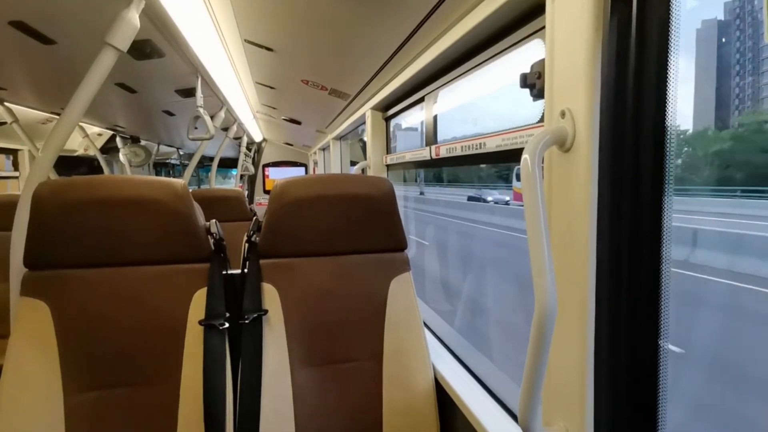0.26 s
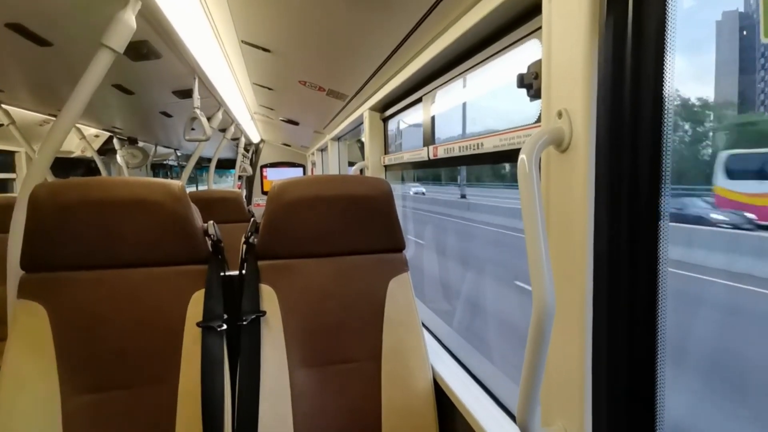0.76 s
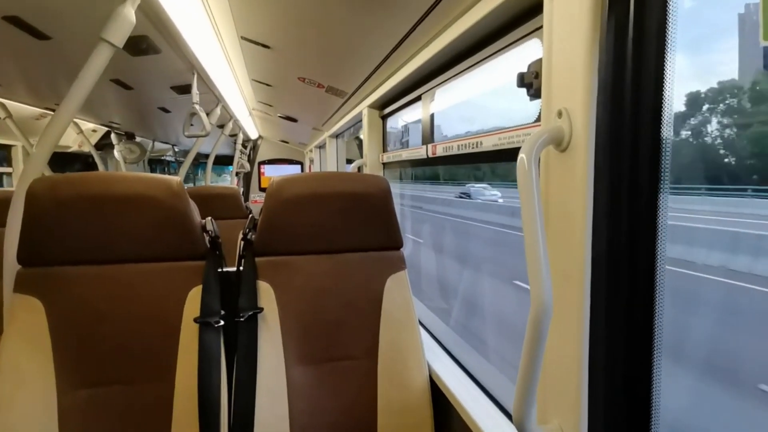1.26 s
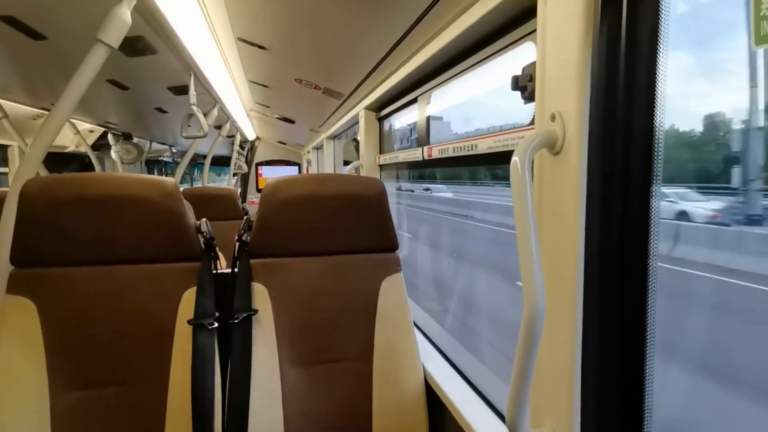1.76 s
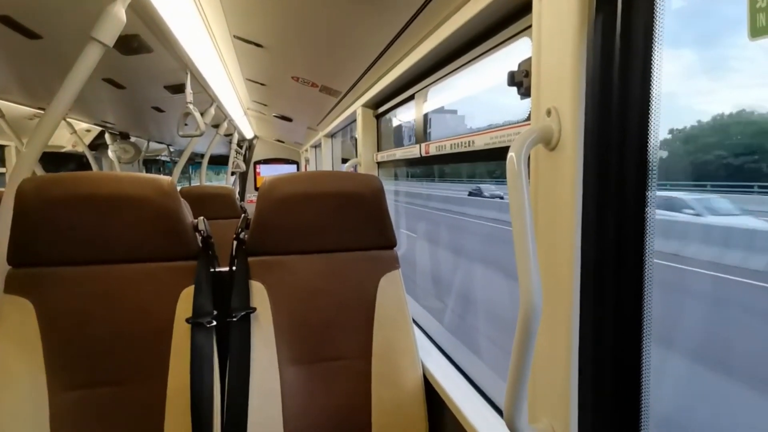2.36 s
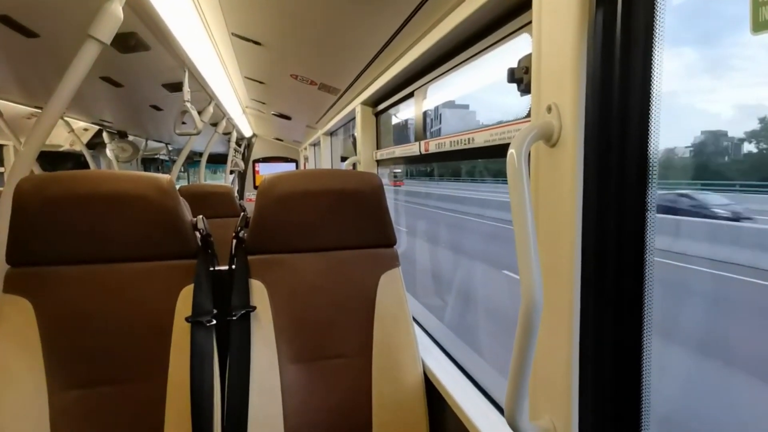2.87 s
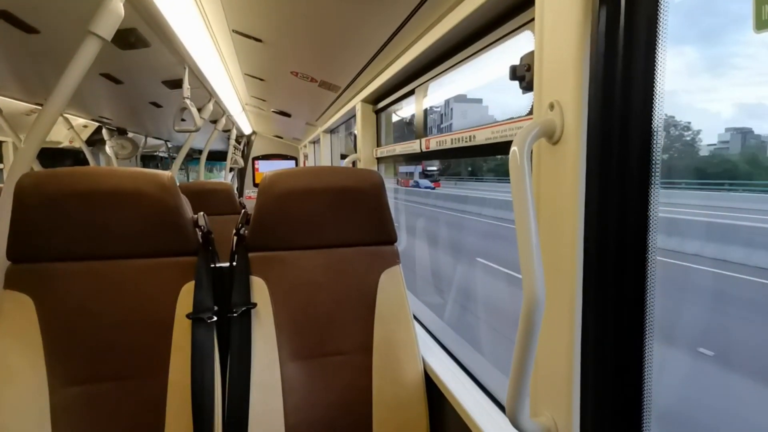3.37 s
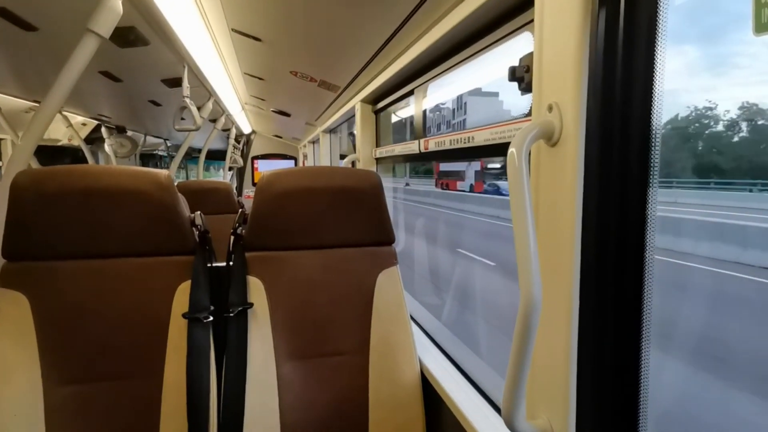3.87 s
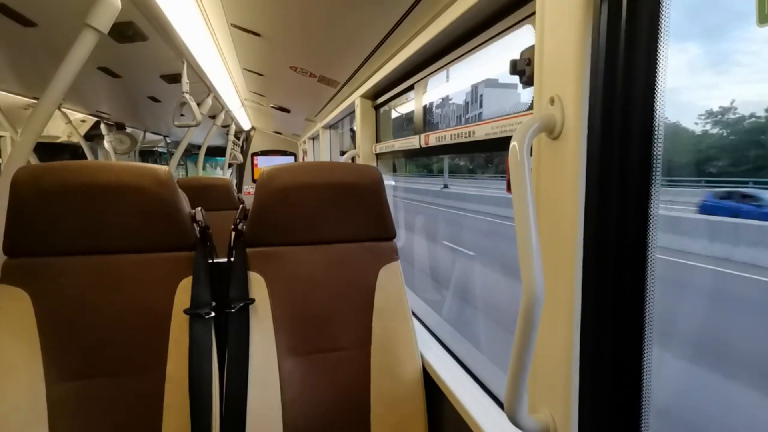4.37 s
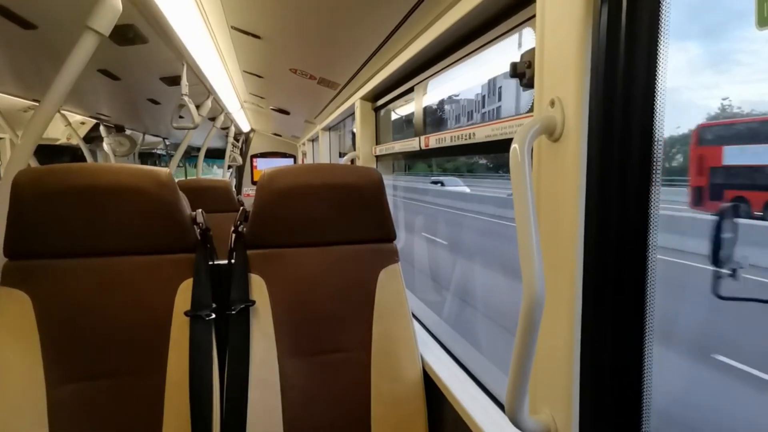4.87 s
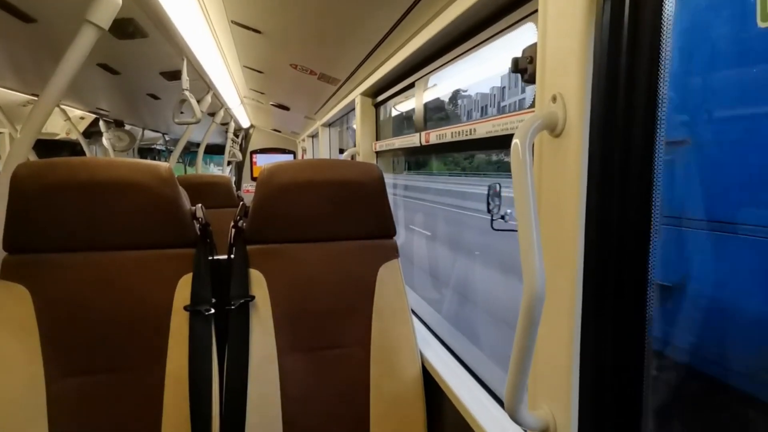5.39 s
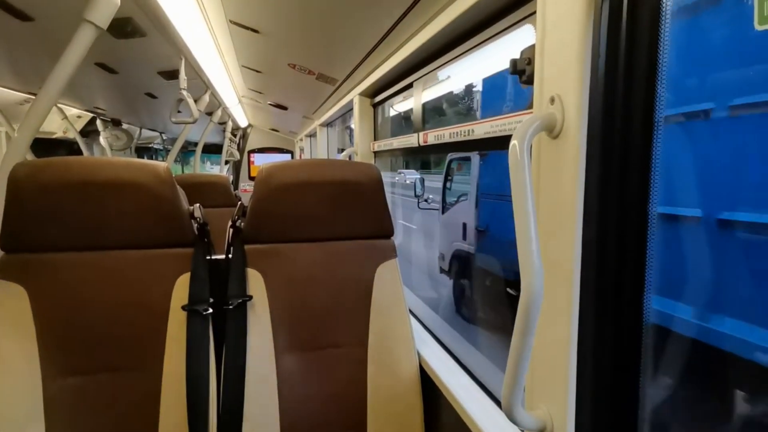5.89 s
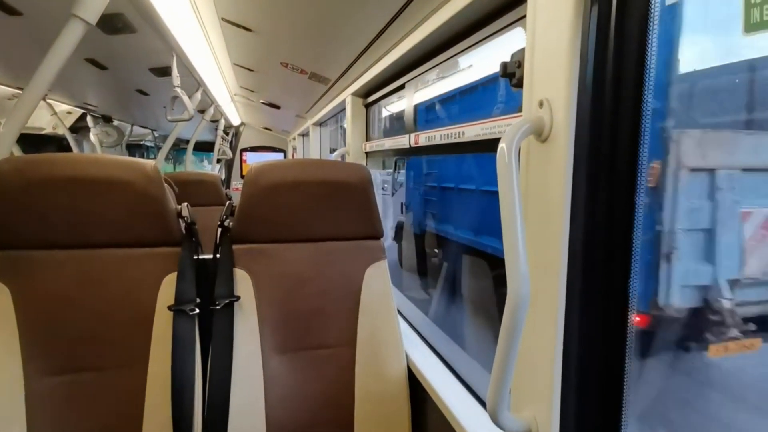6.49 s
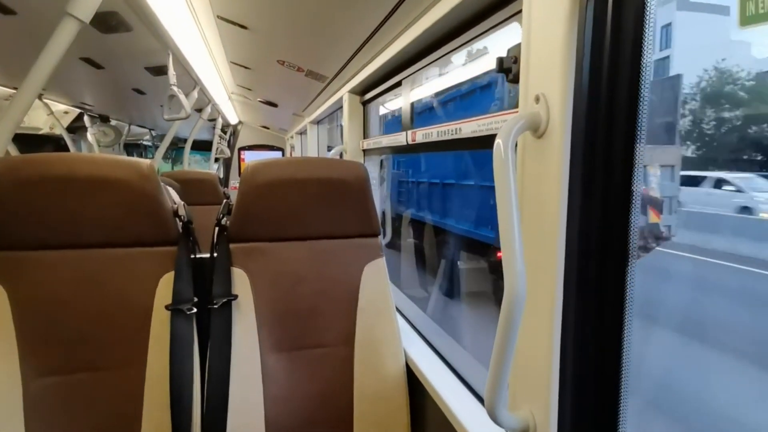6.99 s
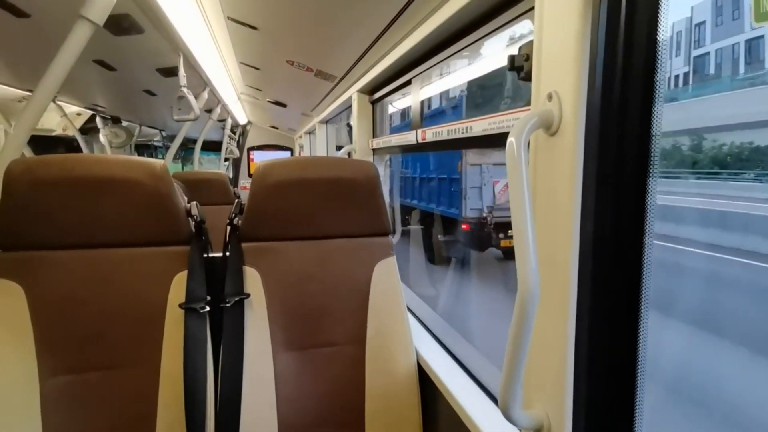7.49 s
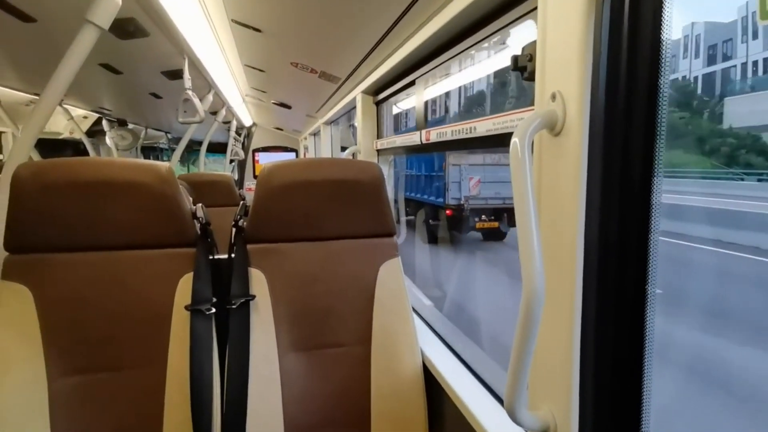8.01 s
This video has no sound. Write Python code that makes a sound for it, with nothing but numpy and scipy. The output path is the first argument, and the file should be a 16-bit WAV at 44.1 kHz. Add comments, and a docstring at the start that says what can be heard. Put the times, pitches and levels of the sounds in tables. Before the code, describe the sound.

Close stereo sound from the rear seats inside a moving double-decker bus. From 0 s a six-cylinder diesel drones deeply, with a strong boom around 130 Hz, a lower throb near 65 Hz and soft road rumble. Its pitch climbs slowly and smoothly throughout, by about two semitones. At 1.7 to 1.9 s the boom falls away sharply, leaving a thinner, quieter hum, then it steadily rebuilds. From 2.5 s coarse engine roar, airy hiss, humming panels and fine loose-trim rattle grow. Small puffs and low buzzes appear around 2.5, 3.3 and 3.9 s. The lower firing throb weakens around 4.5 to 5.8 s and returns by 6.8 s. Faint gear whine comes and goes, and a very high turbo whistle wavers and creeps upward. At 6.4 to 6.9 s a cluster of hissing puffs and buzzes passes. The end, at about 8.2 s, is full, booming and rattly, still under load.

```python
"""A six-cylinder diesel slowly gains speed, heard by two microphones in the rear seats of a double-decker.
Its four-stroke cycle is a comb of low sine orders that boom in the saloon; order 12 drops, then builds.
Gear teeth and the turbocharger whine faintly as sines that waver differently at each microphone.
Road rumble, block roar and hiss are coloured noise; panels hum as narrow bands of noise.
Taps set loose trim ringing, and now and then short bands of noise puff and buzz."""
import sys
import numpy as np
from scipy import signal
from scipy.fft import rfft, irfft, next_fast_len
from scipy.io import wavfile

SR = 44100
rng = np.random.default_rng(int(sys.argv[2]) if len(sys.argv) > 2 else 0)


def waveform_to_disk(signal):
    """Save audio, clipped to [-1, 1], as 16-bit WAV at the path in sys.argv[1]."""
    frames = np.transpose(np.atleast_2d(signal))
    scaled = np.clip(frames, -1, 1) * 32767
    samples = np.round(scaled).astype(np.int16)
    wavfile.write(sys.argv[1], SR, samples)


N = 363825


def from_db(db):
    """Decibels to amplitude gain."""
    return np.exp(np.asarray(db) * (np.log(10) / 20))


def in_time(rows):
    """Table columns joined by straight lines, one value a sample."""
    s, *columns = np.transpose(rows)
    return [np.interp(np.arange(N) / SR, s, column) for column in columns]


def at_hz(points, hz):
    """Spectrum table read on a log-frequency axis."""
    table_hz, values = np.array(points).T
    return np.interp(np.log(hz), np.log(table_hz), values)


def drift(rate_hz):
    """Slow chance of spread 1: noise at every 40th sample through a double one-pole low-pass."""
    r = np.exp(-2 * np.pi * rate_hz * 40 / SR)
    slow = signal.lfilter([1], [1, -2 * r, r * r], rng.standard_normal(N // 40 + 2002))
    slow = slow[2000:]   # the filter has settled
    return np.interp(np.arange(N) / 40, np.arange(len(slow)), slow / slow.std())


# Balance of the two microphones. Each row: frequency in Hz, left minus right in dB.
BALANCE_DB = [(30, 11), (65, 3.5), (100, 7), (128, 4.5), (148, -1), (175, -7), (270, -2.5), (350, 2.5),
              (700, -0.5), (1290, -1), (2400, 1), (4400, -3), (8100, 2.5), (15000, -0.5)]
# Phase lag of the left microphone behind the right. Each row: frequency in Hz, lag in radians.
LEFT_LAG = [(30, 0.98), (130, 0.49), (300, 1), (500, 0.017), (15000, 0.08)]
HALF_EACH = np.array([[.5], [-.5]])   # left and right share a difference equally


def tone(turns, first_hz, last_hz):
    """A sine of rms 1 as the two microphones get it; balance and lag slide with its pitch."""
    balance_db, lag = (np.linspace(at_hz(table, first_hz), at_hz(table, last_hz), len(turns))
                       for table in (BALANCE_DB, LEFT_LAG))
    return np.sqrt(2) * from_db(HALF_EACH * balance_db) * np.cos(2 * np.pi * turns - HALF_EACH * lag)


BOOM_DB, BOOM_BUILDS_DB_PER_S = -14, 2
DROP_AT_S, DROP_TAKES_S, DROP_DB = 1.708, 0.2, 15


def boom_level():
    """The boom, order 12, in dB: it holds, drops away and slowly builds again."""
    since_drop_s = np.arange(N) / SR - DROP_AT_S
    drop_db = DROP_DB * np.clip(since_drop_s / DROP_TAKES_S, 0, 1)
    return BOOM_DB - drop_db + BOOM_BUILDS_DB_PER_S * np.maximum(since_drop_s - DROP_TAKES_S, 0)


# Orders 6, 7 and 9 sink and come back, while order 8 swells and fades.
# Each row: time in seconds, then the levels in dB of the firing order 6 and of orders 7, 8 and 9.
FIRING = [(0.0, -14.5, -23, -37, -22.5), (.75, -16, -21, -40, -21.5), (1.5, -18.5, -22, -45, -22),
          (2.85, -19, -21, -39, -23), (3.5, -24, -22, -35, -27.5), (4.6, -31, -24, -28, -34),
          (5.75, -33, -27.5, -27.5, -43), (6.25, -25, -30, -29, -32), (6.75, -18, -27, -32, -28),
          (7.3, -17.5, -25, -33, -25), (8.25, -17.5, -20, -40, -20)]
# The other orders of the four-stroke cycle. Each row: order, level in dB, share of the firing swell,
# share of the boom swell, dB gained per cycle per second of engine speed.
ORDERS_WEAK = [(5, -38, .27, .1, 9.7), (10, -33, .75, .12, 5.2), (11, -30, 0, .55, 1.1),
               (13, -36.5, -.1, .8, -10), (14, -37.5, -.3, .5, 11), (15, -40.5, .38, .6, 4),
               (16, -36, -.1, .37, 7.5), (17, -48, .1, .6, 0), (18, -35.5, .25, .35, 0),
               (19, -48, -.3, .8, -6), (20, -44.5, -.3, .3, 20), (21, -53, 0, .5, 0), (22, -53, 0, .5, 0),
               (23, -51, 0, .5, 0), (25, -53, 0, .5, 0), (27, -52, 0, .5, 0), (31, -50, 0, .5, 3),
               (34, -52, 0, .5, 3), (24, -48, .5, .85, -2), (29, -52, -.3, .8, 11.7), (30, -45, .2, .6, 3),
               (36, -46.5, -.3, .4, 3), (39, -47, -.3, 0, 8), (66, -58, .2, -.1, 10.8)]
# One cylinder fires hardest: where in the cycle, in turns, orders 6 and 7 swing together.
# The other orders arrive spread over the cycle, and all stray by chance.
STRONG_STROKE_AT, SPREAD_TURNS, STRAY_TURNS = .17, .1, .05
UPPER_WAVER_DB = 1.5   # for orders above the boom
SLOW_TURNS = .02       # slow slide of phase, per 6 orders


def engine_orders(per_s, boom_db, waver_db, waver_turns):
    """Each order is a sine locked to the engine cycle, wavering in level and phase."""
    firing_db, seventh_db, eighth_db, ninth_db = in_time(FIRING)
    cycles = np.cumsum(per_s) / SR
    swells = [curve - curve.mean() for curve in (firing_db, boom_db, per_s)]
    levels_db = {6: firing_db, 7: seventh_db, 8: eighth_db, 9: ninth_db, 12: boom_db}
    for order, db, *shares in ORDERS_WEAK:
        levels_db[order] = db + sum(share * swell for share, swell in zip(shares, swells))
    low = 0
    for order, db in levels_db.items():
        order_waver_db = UPPER_WAVER_DB if order > 12 else waver_db
        gain = from_db(db + order_waver_db * drift(3.0))
        arrival = SPREAD_TURNS * (order - 6.5) ** 2 + STRAY_TURNS * rng.standard_normal()
        slide = order / 6 * (waver_turns * drift(3.7) + SLOW_TURNS * drift(.3))
        turns = order * (cycles - STRONG_STROKE_AT) + arrival + slide
        # all orders are low, so every 8th sample is enough
        low = low + gain[::8] * tone(turns[::8], order * per_s[0], order * per_s[-1])
    return signal.resample_poly(low, 8, 1, axis=1)[:, :N]


MESH_PER_CYCLE, MESH_HARMONICS = 50.1, (8, 9, 10, 11, 12)   # gear teeth met per engine cycle
MESH_DB = -69.5   # each gear harmonic between swells
# A gear harmonic swells out of the hiss.
# Each row: centre in seconds, half length in seconds, harmonic number, peak in dB.
MESH_SWELLS = [(1.0, .9, 8, -62), (.72, .12, 8, -63), (2.1, .22, 8, -57), (2.44, .16, 8, -53),
               (2.8, 0.13, 8, -57), (3.15, .1, 8, -64), (3.7, .1, 8, -59), (5.31, .24, 8, -55),
               (7.1, 0.33, 8, -56), (7.85, 0.13, 8, -59), (1.33, .45, 9, -60.5), (6.05, 0.33, 9, -55),
               (4.5, .3, 10, -63), (5.75, .5, 10, -60), (4.5, .5, 11, -56), (5.4, .4, 11, -49),
               (6.0, .2, 11, -55), (6.9, 0.2, 11, -54), (7.6, .45, 11, -57), (.6, 0.1, 12, -60),
               (1.5, 0.49, 12, -59), (2.9, 0.3, 12, -58), (4.5, 0.28, 12, -63)]
FAINT_ORDER = 432.5   # a fainter whine between gear harmonics 8 and 9, in turns per engine cycle
# Swells of that fainter whine. Each row: centre in seconds, half length in seconds, peak in dB.
FAINT_SWELLS = [(1.02, .16, -63), (1.45, .15, -67), (2.5, .35, -61)]
# Pitch of the turbocharger whistle. Each row: time in seconds, frequency in Hz.
TURBO_HZ = [(0.0, 11950), (.2, 11895), (0.55, 11910), (.85, 12040), (1.4, 12000), (1.9, 12120),
            (2.6, 12135), (3.15, 12280), (3.8, 12250), (4.3, 12275), (5.0, 12360), (5.9, 12380),
            (6.4, 12420), (7.2, 12440), (8.25, 12505)]
# The whistle throbs about once a second and the throb flattens with time.
TURBO_DB, THROB_DB = -62.5, 8
THROB_FIRST_S, THROB_PERIOD_S, THROB_FADE_S = 0.35, 0.98, 8


def whines(per_s, flicker_db, jitter_turns):
    """Gear-mesh harmonics and turbocharger: sines that break up separately at each microphone."""
    t = np.arange(N) / SR
    lines = []   # pitch in Hz and gain of each whine
    for k in MESH_HARMONICS:
        swells = sum(from_db(db) * np.exp(-((t - s) / half) ** 8)
                     for s, half, harmonic, db in MESH_SWELLS if harmonic == k)
        lines.append((k * MESH_PER_CYCLE * per_s, from_db(MESH_DB) + swells))
    faint = sum(from_db(db) * np.exp(-((t - s) / half) ** 4) for s, half, db in FAINT_SWELLS)
    lines.append((FAINT_ORDER * per_s, faint))
    throb = np.exp(-t / THROB_FADE_S) * np.cos(2 * np.pi * (t - THROB_FIRST_S) / THROB_PERIOD_S)
    lines.append((in_time(TURBO_HZ)[0], from_db(TURBO_DB + THROB_DB * throb)))
    out = np.zeros((2, N))
    for hz, gain in lines:
        shared_turns = np.cumsum(hz) / SR + rng.random() + jitter_turns * drift(11.0)
        for microphone, offset_turns in zip(out, (0, 1 / 4)):
            turns = shared_turns + offset_turns + jitter_turns / 2 * drift(4.5)
            flicker = from_db(flicker_db * drift(16.0))
            microphone += np.sqrt(2) * gain * flicker * np.cos(2 * np.pi * turns)
    return out


# How alike the noise is at the two microphones.
# Each row: frequency in Hz, likeness from -1 (opposite) to 1 (the same).
LIKENESS = [(30, 0.95), (130, 0.87), (290, 0.99), (640, 0.46), (1400, -0.32), (3000, 0.068),
            (15000, -0.056)]


def stereo_white():
    """Frequencies and the two channels' spectra of noise with the saloon's likeness, balance and lag."""
    size = next_fast_len(N)
    hz = np.maximum(np.arange(size // 2 + 1) * SR / size, 1)
    mid, side = rfft(rng.standard_normal((2, size)))
    alike = np.clip(at_hz(LIKENESS, hz), -1, 1)
    pair = np.sqrt(1 + alike) * mid + np.sqrt(1 - alike) * side * 2 * HALF_EACH
    balance = from_db(HALF_EACH * at_hz(BALANCE_DB, hz))
    return hz, pair * balance * np.exp(-1j * HALF_EACH * at_hz(LEFT_LAG, hz))


def mid_rms_one(x):
    """Scaled so that the mean of both channels has rms 1."""
    return x / np.sqrt(np.mean(x.mean(axis=0) ** 2))


# Panels colour the noise. Each row: frequency in Hz, width in Hz, lift (or dip, if negative) in dB.
PANELS = [(246, 6.3, 3.5), (840, 200, -2), (1651, 13, 8)]


def saloon_noise(spectrum, patchy_db):
    """Noise coloured by source and panels, in octave bands that each flicker a little."""
    hz, pair = stereo_white()
    panels_db = sum(db / (1 + (2 * (hz - f) / width) ** 2) for f, width, db in PANELS)
    pair = pair * from_db(at_hz(spectrum, hz) + panels_db)
    octave = np.log2(hz)
    lowest, highest = np.log2(spectrum[0][0]), np.log2(spectrum[-1][0])
    out = 0
    for centre in np.arange(np.floor(lowest), highest + 1):
        # neighbouring bands add up to one
        band = np.cos(np.pi / 2 * np.clip(octave - centre, -1, 1)) ** 2
        sound = irfft(pair * band, next_fast_len(N))[:, :N]
        out = out + from_db(patchy_db * drift(12.6)) * sound
    return mid_rms_one(out)


# Spectrum of the road under the floor. Each row: frequency in Hz, relative level in dB per Hz.
RUMBLE = [(15, -22), (25, -11), (38, -4), (50, -5.5), (70, -4), (110, -4), (150, -4), (200, -16.5),
          (300, -18.5), (500, -30)]
RUMBLE_DB, RUMBLE_LUMPS_DB = -25.3, 1.5   # mean level, spread of its slow wander
RUMBLE_FOLLOWS = 0.33   # share of the boom swell


def road_rumble(boom_swell_db):
    """Low road noise that wanders slowly and partly follows the boom."""
    level_db = RUMBLE_DB + RUMBLE_FOLLOWS * boom_swell_db + RUMBLE_LUMPS_DB * drift(0.53)
    return from_db(level_db) * saloon_noise(RUMBLE, patchy_db=0.5)


# Spectrum of the hiss in the saloon. Each row: frequency in Hz, relative level in dB per Hz.
HISS = [(880, -7), (1500, -0.5), (2130, -5.5), (2440, 0.5), (2880, -4.5), (3540, -4.5), (4100, -6),
        (4560, -8), (5030, -9.5), (6680, -4), (7730, -13), (9310, -7), (12400, -10.5), (15500, -22)]
HISS_DB, HISS_GAINS_DB = -46.5, 9


def hiss(built):
    """High noise that grows with the build-up."""
    return from_db(HISS_DB + HISS_GAINS_DB * built) * saloon_noise(HISS, patchy_db=1.4)


def narrow(hz, pair, centre_hz, width_hz):
    """A narrow resonant band of the noise, with the mean of both channels at rms 1."""
    resonance = 1 / (1 + (2 * (hz - centre_hz) / width_hz) ** 2)
    return mid_rms_one(irfft(pair * resonance, next_fast_len(N))[:, :N])


# Humming fittings. Each row: frequency in Hz, width in Hz, level in dB relative to the roar.
HUM = [(2363, 56, -30.5), (2471, 38, -27), (3218, 73, -27), (3505, 53, -29), (3637, 54, -25)]


def panel_hum(surge_db):
    """Fittings ring on narrow bands of noise and surge unevenly."""
    hz, pair = stereo_white()
    return sum(from_db(db + surge_db * drift(4.0)) * narrow(hz, pair, centre_hz, width_hz)
               for centre_hz, width_hz, db in HUM)


# Ringing modes of the loose trim. Each row: frequency in Hz, level in dB, time to fall 60 dB in seconds.
TRIM = [(650, -2, .07), (735, -3, .07), (786.6, 2, 0.12), (858, -0.5, .1), (930, -1, .12), (1019, -4, .1),
        (1164, -6.5, 0.11), (1246, -7, 0.092), (1450, -9, .08)]
# Gusts of rattle. Each row: time in seconds, level in dB relative to the roar.
RATTLE_GUSTS = [(0.0, -13.5), (4.5, -14.5), (4.9, -12.5), (5.4, -13.5), (5.8, -12), (6.4, -12.5),
                (7.2, -11), (7.6, -12.5), (8.25, -11)]
RATTLE_PER_S, RATTLE_CLUMPS_DB = 160, 2.5   # typical taps per second, spread of that rate
RATTLE_UNEVEN_DB = 3.5   # mean rise of a tap above the smallest, before the cap


def trim_rattle():
    """Uneven taps in clumps, drawn apart for each microphone, set the trim ringing."""
    rise_db = RATTLE_UNEVEN_DB * np.minimum(rng.exponential(1, (2, N)), 5)
    sizes = from_db(rise_db) * rng.choice([-1, 1], (2, N))
    rate_per_s = RATTLE_PER_S * from_db(RATTLE_CLUMPS_DB * drift(5.0))
    taps = sizes * (rng.random((2, N)) < rate_per_s / SR) + 1e-18   # never quite zero
    out = 0
    for hz, db, t60 in TRIM:
        r, w = from_db(-60 / (t60 * SR)), 2 * np.pi * hz / SR
        delayed = np.roll(taps, rng.integers(SR // 20), axis=1)
        ringing = signal.lfilter([0, np.sin(w)], [1, -2 * r * np.cos(w), r * r], delayed)
        out = out + from_db(db) * ringing
    return from_db(in_time(RATTLE_GUSTS)[0]) * mid_rms_one(out)


# Spectrum of the engine block. Each row: frequency in Hz, relative level in dB per Hz.
ROAR = [(130, -1), (220, -4.5), (301, -12), (370, -3.5), (465, -4), (534, -8.5), (586, -12), (660, -15.5),
        (802, -13.5), (980, -16.5), (2000, -29), (2600, -42), (4400, -120)]
ROAR_DB, ROAR_GAINS_DB = -36.5, 11.5
ROAR_FOLLOWS = 0.053   # share of the boom swell


def block_roar(boom_swell_db, built):
    """Block noise grows with the build-up, and humming fittings and trim rattle rise with it."""
    level_db = ROAR_DB + ROAR_GAINS_DB * built + ROAR_FOLLOWS * boom_swell_db
    return from_db(level_db) * (saloon_noise(ROAR, patchy_db=2.0) + panel_hum(surge_db=2.5) + trim_rattle())


# Two floor panels. Each row: frequency in Hz, width in Hz.
FLOOR_PANELS = [(471, 27), (580.7, 40)]
# How loud they hum. Each row: time in seconds, lower panel in dB, upper panel in dB.
FLOOR_HUM = [(0.0, -50, -48), (.5, -50, -48), (.75, -39, -44), (1.3, -39, -50), (1.6, -43.5, -48.5),
             (2.0, -39, -48), (2.3, -47, -54), (2.5, -42, -45), (2.8, -41, -51), (3.25, -36.5, -43),
             (3.5, -38, -49), (3.9, -38, -41), (4.1, -38, -49), (4.3, -36, -43), (4.5, -40, -45),
             (4.75, -36, -39), (5.2, -37, -45), (5.8, -33, -45), (6.1, -37, -42), (6.3, -33, -42),
             (6.55, -38, -41), (7.05, -31, -40), (7.6, -34, -42), (8.0, -31, -39), (8.25, -33, -36)]


def floor_hum(surge_db):
    """Two floor panels hum on narrow bands of noise, each with its own swelling level."""
    hz, pair = stereo_white()
    return sum(from_db(db + surge_db * drift(7.0)) * narrow(hz, pair, centre_hz, width_hz)
               for (centre_hz, width_hz), db in zip(FLOOR_PANELS, in_time(FLOOR_HUM)))


# Short puffs and buzzes. Each row: peak time in seconds, rise in seconds, fall in seconds,
# centre in Hz, width in octaves, peak in dB.
BURSTS = [(2.55, .03, 0.054, 10300, 0.98, -46), (3.87, 0.049, .06, 283, 0.11, -35),
          (3.87, 0.033, 0.081, 380, 0.12, -30), (3.21, .02, 0.065, 510, 0.32, -32.5),
          (3.36, .02, .03, 520, 0.28, -34), (.36, .004, .014, 5900, .04, -52),
          (6.61, .01, .03, 4600, .5, -42), (6.74, 0.043, .07, 6100, .12, -45.5),
          (6.85, .015, .02, 2450, .06, -44), (4.45, 0.031, 0.099, 2900, 0.72, -46.5),
          (6.44, .02, 0.043, 3000, 0.91, -42), (6.625, 0.012, 0.066, 4200, 0.075, -40),
          (6.7, .03, 0.04, 4030, 0.07, -44.5), (6.76, .03, 0.06, 4100, 0.09, -45),
          (6.615, 0.012, 0.04, 5560, .04, -47), (6.64, 0.063, 0.27, 6900, 1, -44.5),
          (6.7, 0.16, 0.19, 2600, 0.74, -39.5), (6.7, 0.038, 0.083, 390, 0.063, -27.5)]


def bursts():
    """Short puffs and buzzes: each is a band of noise that swells and dies."""
    size = 2 ** 16   # about a second and a half, the peak a quarter of the way in
    white = irfft(stereo_white()[1], next_fast_len(N))
    out = np.zeros((2, N + size))
    hz = np.maximum(np.arange(size // 2 + 1) * SR / size, 1)
    t = (np.arange(size) - size // 4) / SR
    for s, rise, fall, centre_hz, octaves, peak_db in BURSTS:
        first = int(s * SR)
        noise = white[:, rng.integers(N - size):][:, :size]
        band = irfft(rfft(noise) * np.exp(-(np.log2(hz / centre_hz) / octaves) ** 2), size)
        swell = np.exp(-(t / np.where(t < 0, rise, fall)) ** 2)
        out[:, first:first + size] += from_db(peak_db) * swell * mid_rms_one(band)
    return out[:, size // 4:][:, :N]


# Engine speed. Each row: time in seconds, four-stroke cycles per second.
SPEED = [(0.0, 10.885), (2.75, 11.392), (3.85, 11.574), (5.5, 11.84), (6.9, 12.055), (8.25, 12.289)]
BUILD_FROM_S, BUILD_EASES_S = 2.48, 4.53   # the build-up starts here, then levels off at this pace


def scene():
    """Engine orders and whines over rumble, hiss, roar and floor hum, with short bursts."""
    per_s, = in_time(SPEED)
    boom_db = boom_level()
    boom_swell_db = boom_db - boom_db.mean()
    built = 1 - np.exp(-np.maximum(np.arange(N) / SR - BUILD_FROM_S, 0) / BUILD_EASES_S)
    engine = engine_orders(per_s, boom_db, waver_db=1.1, waver_turns=0.012)
    whine = whines(per_s, flicker_db=2.6, jitter_turns=0.07)
    beds = road_rumble(boom_swell_db) + hiss(built) + block_roar(boom_swell_db, built)
    return engine + whine + beds + floor_hum(surge_db=1.0) + bursts()


CUTOFF_HZ = 15620


def record(dry):
    """The sound fades in over 2 ms, the highest peaks are rounded, the top is cut."""
    dry = dry * np.minimum(np.arange(N) / (.002 * SR), 1)
    rounded = dry / (1 + np.abs(dry / .95) ** 6) ** (1 / 6)
    top_cut = signal.ellip(10, .5, 70, CUTOFF_HZ, fs=SR, output="sos")
    return signal.sosfilt(top_cut, rounded)


dry = scene()
out = record(dry)
waveform_to_disk(out)
```